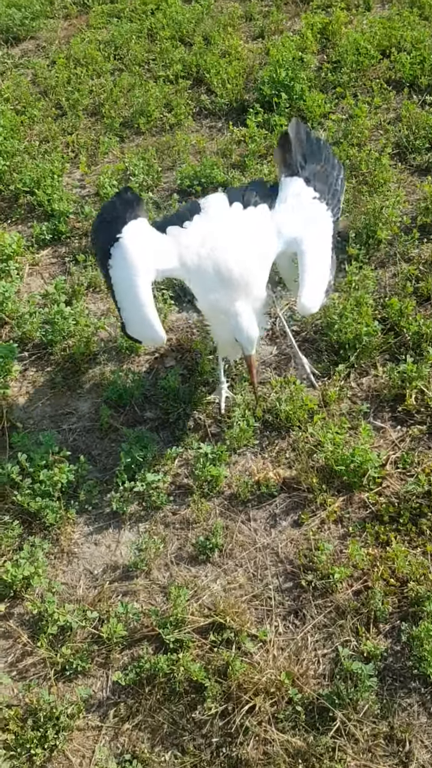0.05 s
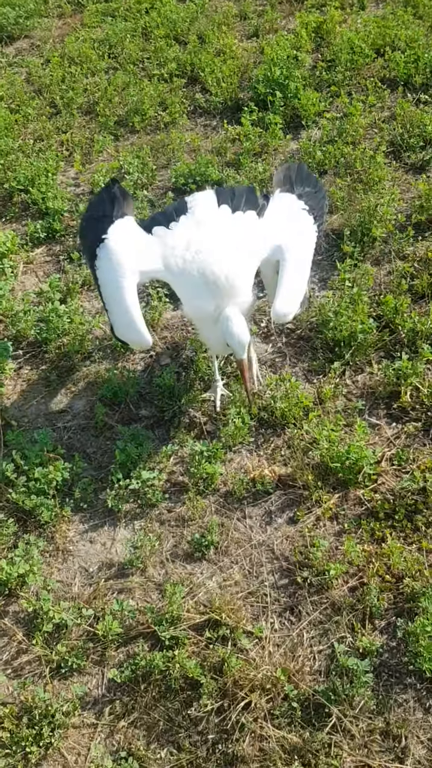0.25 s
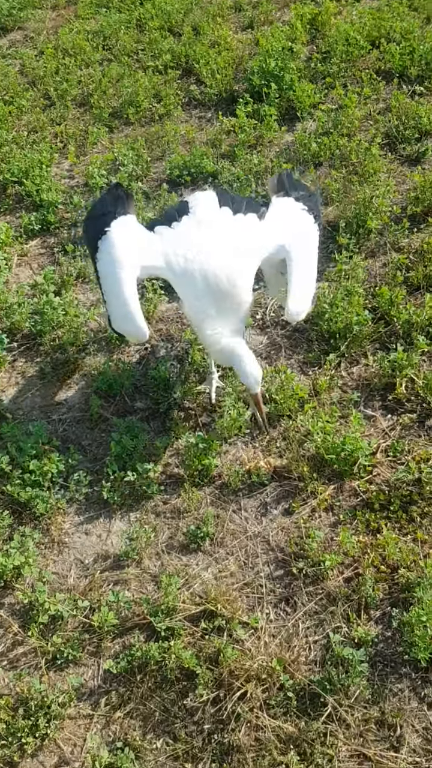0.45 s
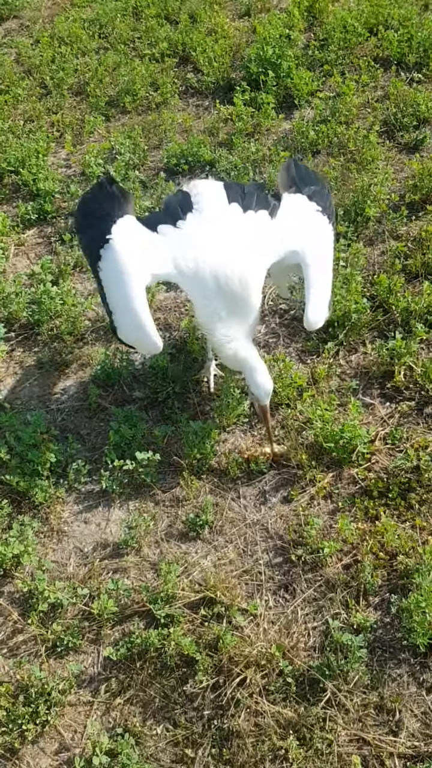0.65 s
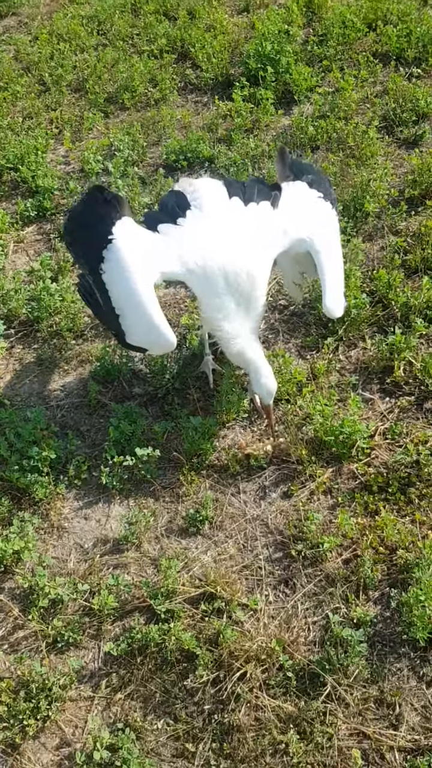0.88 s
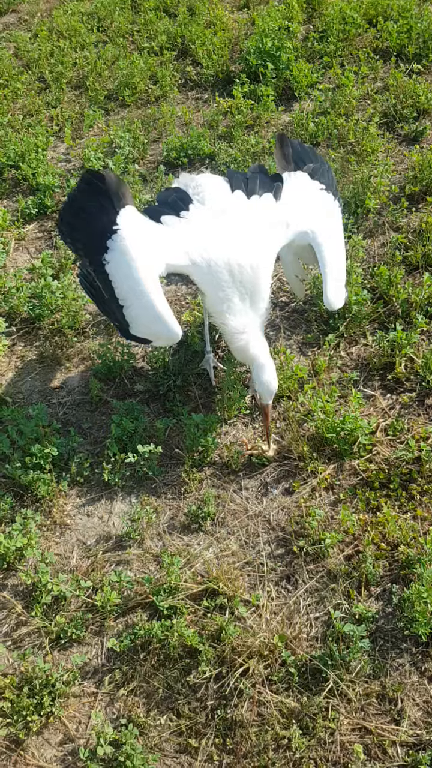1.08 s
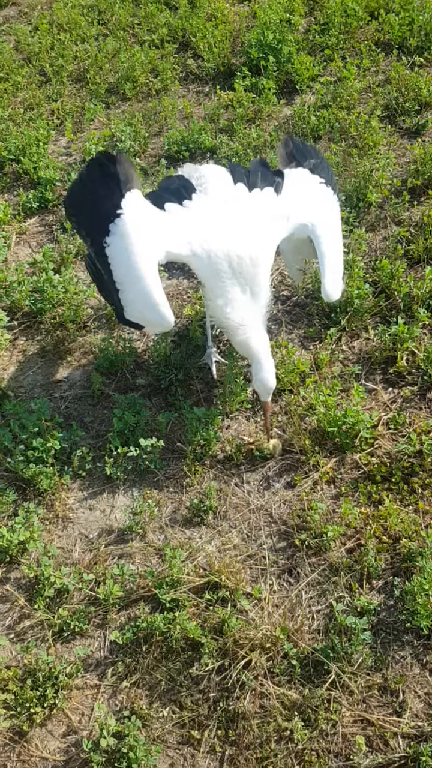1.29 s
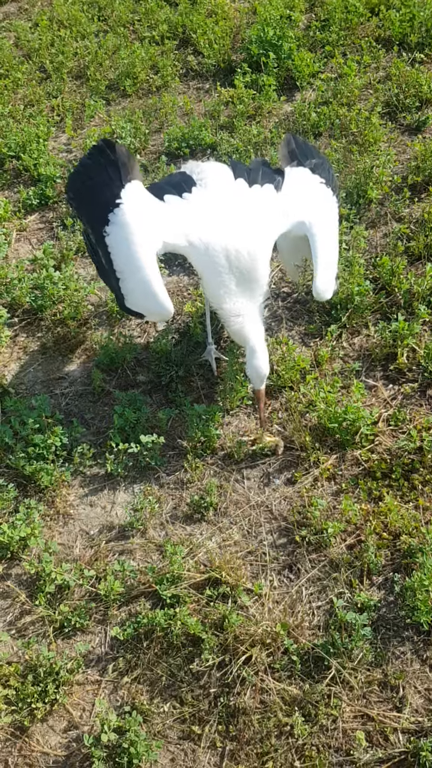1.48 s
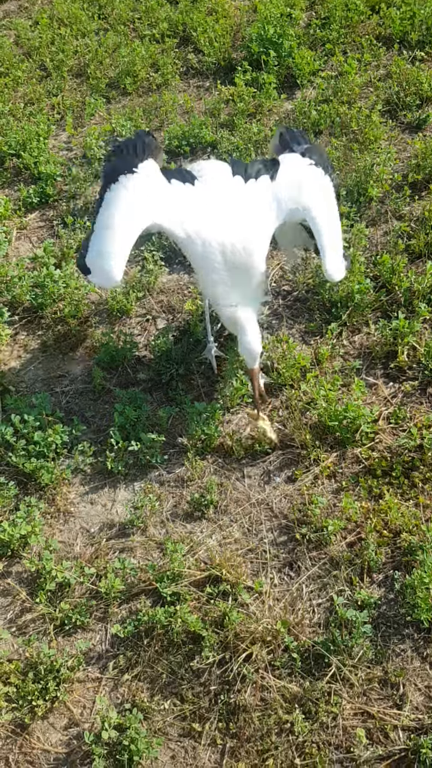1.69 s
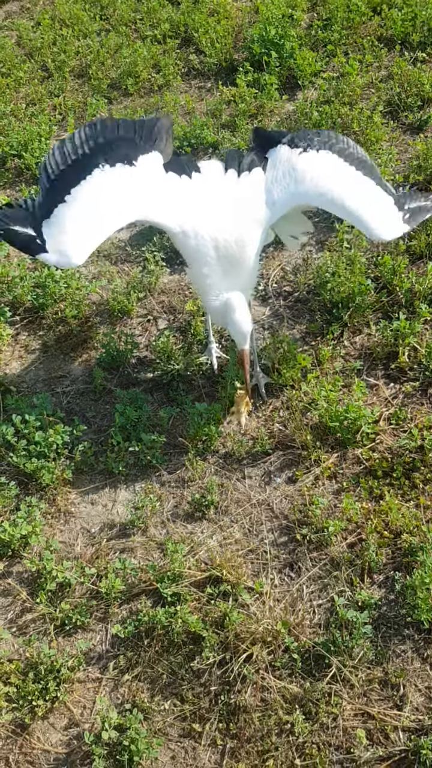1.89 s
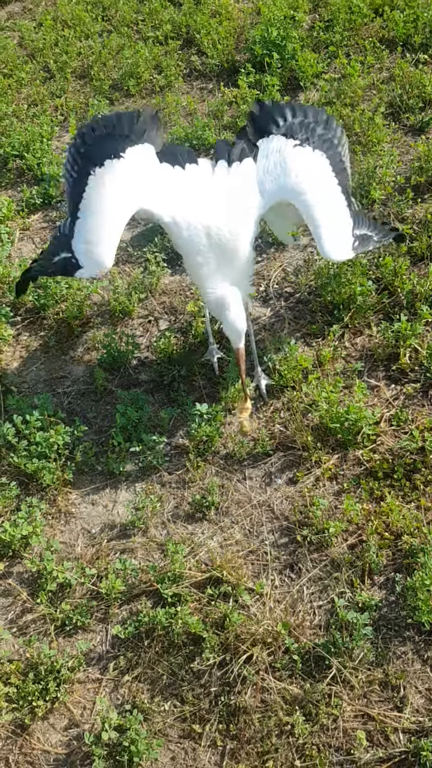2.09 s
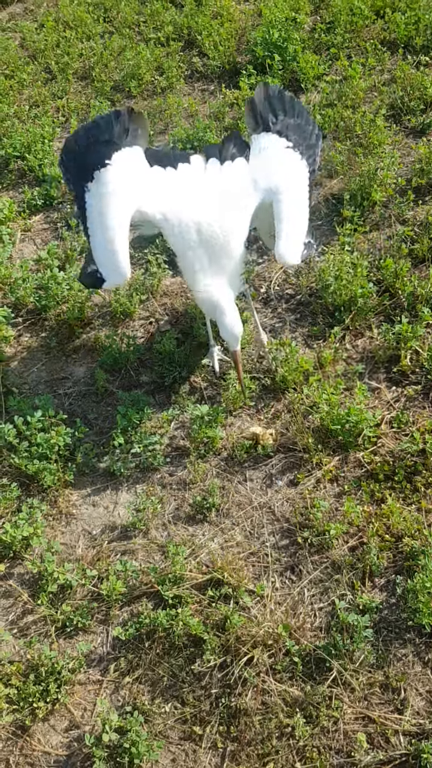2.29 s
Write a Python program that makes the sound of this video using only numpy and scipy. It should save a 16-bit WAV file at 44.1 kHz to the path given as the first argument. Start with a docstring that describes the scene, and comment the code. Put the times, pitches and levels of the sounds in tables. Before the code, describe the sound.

A large bird gives one long, harsh, whistling hiss, then snaps its bill.

```python
"""A stork hissing in a field

A stork gives one long, harsh hiss: turbulent air excites the resonances of its throat and bill, which
slide down as the call goes on, and now and then the jet locks onto a resonance and whistles.
A soft hollow wheeze and a snap of the bill follow. Behind the bird are a low rumble,
a motor's hum, faint far traffic and two soft thumps."""
import sys
import numpy as np
from scipy import signal
from scipy.fft import rfft, irfft, next_fast_len
from scipy.io import wavfile
from scipy.ndimage import uniform_filter1d, map_coordinates

SR = 44100
rng = np.random.default_rng(int(sys.argv[2]) if len(sys.argv) > 2 else 0)


def dump_mix(stems):
    """Bounce the given channels to the path in sys.argv[1] as a 16-bit WAV at rate SR."""
    frames = np.atleast_2d(stems).T  # one column per channel
    limited = np.clip(frames, -1, 1)  # hard clip at full scale
    pcm = np.round(limited * 32767).astype(np.int16)
    wavfile.write(sys.argv[1], SR, pcm)


N = 108045
TIME = np.arange(N) / SR
FRAME, HOP = 512, 64  # short-time spectrum, in samples


def amp(db):
    """Amplitude ratio of a level in decibels."""
    return 10 ** (np.asarray(db) / 20)


def along(points, hz):
    """Interpolation of (f/Hz, value) points on a logarithmic frequency axis."""
    f, values = np.transpose(points)
    return np.interp(np.log(hz + 1), np.log(f + 1), values)


def curves(rows, t):
    """Linear interpolation in time of each column after the first."""
    times, *columns = np.transpose(rows)
    return [np.interp(t, times, column) for column in columns]


def during(rows, t):
    """Gate: unity while a curve lasts, with a 20 ms ramp on either side."""
    return np.clip(np.minimum(t - rows[0][0], rows[-1][0] - t) / .02 + 1, 0, 1)


def wobble(rate):
    """Smooth random modulation: a spline through `rate` Gaussian knots a second."""
    return map_coordinates(rng.standard_normal(N // 8), [TIME * rate], mode="mirror")


def filtered(x, response):
    """Linear filtering: the spectrum is multiplied by a complex frequency response."""
    size = next_fast_len(N + SR // 4)
    return irfft(rfft(x, size) * response(np.fft.rfftfreq(size, 1 / SR)), size)[..., :N]


def noise(correlation):
    """Stereo white noise of unit power per Hz; rows of (f/Hz, correlation) link the channels."""
    def mid_side_gains(hz):
        angle = np.arccos(np.clip(along(correlation, hz), -1, 1)) / 2
        return np.array([np.cos(angle), np.sin(angle)])
    mid, side = filtered(rng.standard_normal((2, N)), mid_side_gains)
    return np.sqrt(SR / 2) * np.array([mid + side, mid - side])


def coloured_noise(spectrum, correlation):
    """Spectral shaping: noise whose density follows rows of (f/Hz, level/dB)."""
    return filtered(noise(correlation), lambda hz: amp(along(spectrum, hz)))


def pan(db):
    """Constant-power gains for a left-minus-right level difference."""
    gains = amp(np.array([np.atleast_1d(db), -np.atleast_1d(db)]) / 2)
    return gains / np.sqrt(np.mean(gains ** 2, axis=0))


def peak(hz, centre_hz, width_hz):
    """Lorentzian resonance curve: the amplitude halves at width_hz from the centre."""
    return 1 / (1 + ((hz - centre_hz) / width_hz) ** 2)


def rumble():
    """Low-frequency noise under slight, slow amplitude modulation."""
    # spectral density: f/Hz, level/dB
    spectrum = [(20, -84.5), (50, -67), (120, -70.5), (170, -81.5), (400, -93.5), (2000, -150)]
    low_noise = coloured_noise(spectrum, correlation=[(60, 0.31), (250, 0.56)])
    return low_noise * amp(0.63 * wobble(6.04)) * pan(db=4)


def motor_hum(pitch_hz=102.2):
    """Periodic vibration of a motor: a fundamental and a weak second harmonic, wavering slightly."""
    phase = 2 * np.pi * np.cumsum(pitch_hz + .5 * wobble(6.07)) / SR
    tone = np.sqrt(2) * (amp(-50) * np.sin(phase) + amp(-68) * np.sin(2 * phase))
    return tone * amp(1.3 * wobble(7.8)) * pan(db=17.5)


def far_traffic():
    """Distant traffic merges into stationary noise, strongest near 900 Hz."""
    # spectral density: f/Hz, level/dB
    spectrum = [(600, -104), (900, -88.5), (1300, -100.5), (1800, -105), (3000, -113), (6700, -113),
                (8100, -135), (10500, -114)]
    return coloured_noise(spectrum, correlation=[(900, -0.36), (3000, 0.087)])


def thumps():
    """Soft transients: low narrow-band noise under Gaussian envelopes."""
    # t/s, half-width/s, f/Hz, level/dB, left minus right/dB
    bursts = [(0.157, 0.017, 101, -55.5, -5), (1.495, 0.038, 59.6, -58.5, -16)]
    out = np.zeros((2, N))
    for at, half_width, centre, db, side_db in bursts:
        band = filtered(noise([(60, 0.8)]), lambda hz: peak(hz, centre, width_hz=45))
        out += band * amp(db) * pan(side_db) * np.exp(-((TIME - at) / half_width) ** 2)
    return out


def ridges(shape, sag_bins_per_s=6):
    """Random spectral modulation of unit variance: narrow, brief ridges that sink in frequency."""
    field = uniform_filter1d(rng.standard_normal(shape), size=2, axis=0)
    for frames in (50, 16):
        field = uniform_filter1d(field, size=frames, axis=1)
    row, frame = np.indices(shape)
    sheared_row = row + sag_bins_per_s * frame * HOP / SR
    field = map_coordinates(field, [sheared_row, frame], order=1, mode="mirror")
    return field / field.std()


def turbulence(hz, t):
    """Power spectrum of turbulent flow through the bill: broadband, with a moving treble cutoff."""
    # rush of air: t/s, level/dB, cutoff f/Hz
    airflow = [(.335, -10, 2500), (.365, 0.5, 4700), (.43, -7, 5600), (.58, -1, 7480), (.8, -1.5, 7500),
               (.93, -5, 7200), (1.1, -0.5, 6660), (1.37, -4.5, 6270), (1.5, -3, 5800), (1.67, -6, 5600),
               (1.885, -2.5, 4500), (1.955, -30, 3170)]
    # spectral density of the rush: f/Hz, level/dB
    rush_spectrum = [(550, -103), (900, -92.5), (2400, -75), (3400, -72), (4400, -78.5), (6100, -86),
                     (7400, -91), (8300, -118)]
    # spectral density of the thin fizz at the bill's edges: f/Hz, level/dB
    fizz_spectrum = [(8200, -120), (9400, -102), (12000, -100), (15500, -112)]
    flow_db, cutoff_hz = curves(airflow, t)
    rush = amp(along(rush_spectrum, hz)) ** 2 / (1 + (hz / cutoff_hz) ** 8)
    fizz = amp(along(fizz_spectrum, hz)) ** 2 * cutoff_hz / cutoff_hz.max()
    return (rush + fizz) * (during(airflow, t) * amp(flow_db)) ** 2


def flares(hz, t):
    """Power spectrum of side resonances, each excited briefly under a Gaussian envelope."""
    # t/s, half-width/s, f/Hz, level/dB
    side_modes = [(0.341, 0.011, 650, -68), (0.361, .013, 2760, -56), (0.365, 0.036, 1420, -74.5),
                  (0.568, 0.034, 3730, -64.5), (0.638, 0.036, 1660, -74.5), (0.802, 0.028, 2140, -66.5),
                  (0.846, 0.028, 3820, -58.5), (1.281, 0.034, 3690, -64.5), (1.62, 0.041, 1625, -65.5),
                  (1.66, 0.046, 3120, -68), (1.768, 0.016, 2820, -60)]
    power = 0
    for at, half_width, centre, db in side_modes:
        envelope = amp(db) * np.exp(-((t - at) / half_width) ** 2)
        power += (envelope * peak(hz, centre, width_hz=124)) ** 2
    return power


def resonance(track, hz, t, width_hz):
    """Power spectrum of a formant, a cavity resonance whose centre and level glide."""
    centre, db = curves(track, t)
    return (during(track, t) * amp(db) * peak(hz, centre, width_hz)) ** 2


def ringing(track, gain_db, rate):
    """A resonance close to self-oscillation gives a narrow tone of random amplitude and phase."""
    centre, db = curves(track, TIME)
    swing = wobble(rate) + 1j * wobble(rate)
    carrier = np.exp(2j * np.pi * np.cumsum(centre) / SR)
    return during(track, TIME) * amp(db + gain_db) * np.real(swing * carrier)


def swoops(hz, t, fall_fraction=0.59):
    """Power spectrum of a high resonance that is tuned downward as the bill moves."""
    # onset t/s, duration/s, starting f/Hz, level/dB
    glides = [(0.687, 0.15, 6070, -67), (0.952, 0.074, 6340, -71), (1.344, 0.14, 6900, -74),
              (1.659, 0.11, 6400, -75.5), (1.747, 0.072, 5100, -69)]
    power = 0
    for start, duration, from_hz, db in glides:
        progress = np.clip((t - start) / duration, 0, 1)
        envelope = amp(db) * np.sin(np.pi * progress) * np.sqrt(progress)
        power += (envelope * peak(hz, from_hz * (1 - fall_fraction * progress), width_hz=475)) ** 2
    return power


def hiss(ridge_db=3.5, rasp_db=1.0):
    """Source and filter: fluttering turbulence is shaped by the resonances of throat and bill."""
    # four formant tracks: t/s, f/Hz, level/dB
    main = [(.44, 2928, -74), (.68, 2914, -71), (.78, 3345, -58), (.83, 3400, -65.5), (.92, 3080, -62.5),
            (.97, 2879, -68), (1.24, 2934, -72), (1.34, 3080, -67.5), (1.45, 2560, -62),
            (1.56, 2642, -65.5), (1.61, 2590, -71.5), (1.69, 2660, -64), (1.775, 1830, -68),
            (1.87, 1700, -64.5), (1.95, 1550, -84.5)]
    middle = [(0.602, 2160, -83), (1.381, 2287, -69.5), (1.5, 2152, -59.5), (1.6, 2340, -66.5)]
    throat = [(.82, 1420, -86.5), (.94, 1400, -70.5), (1.06, 1290, -74), (1.76, 1209, -69),
              (1.93, 1157, -87)]
    windpipe = [(1.1, 626, -87.5), (1.33, 627, -71), (1.91, 593, -67), (1.97, 510, -85)]
    # likeness of the two channels: f/Hz, correlation
    correlation = [(500, 0.84), (4800, 0.41), (8500, .1)]
    hz, t, source = signal.stft(noise(correlation), SR, nperseg=FRAME, noverlap=FRAME - HOP)
    hz = hz[:, None]
    ridge_gain = amp(ridge_db * ridges(source.shape[1:]))
    power = turbulence(hz, t) * ridge_gain ** 2 + flares(hz, t) + swoops(hz, t) * ridge_gain
    for track, width_hz in (main, 164), (middle, 72), (throat, 112), (windpipe, 81.4):
        power += resonance(track, hz, t, width_hz)
    sound = signal.istft(source * np.sqrt(power), SR, nperseg=FRAME, noverlap=FRAME - HOP)[1][:, :N]
    sound += sum(ringing(track, gain_db=16.5, rate=80) for track in (main, middle))
    sound += ringing(throat, gain_db=17, rate=45)  # the throat rings more purely
    return sound * amp(rasp_db * wobble(220))


def whistles(lock_db=-33.5):
    """Lock-in of the jet to a resonance: a clear tone with its octave, turning rough below lock_db."""
    # one track per whistle: t/s, f/Hz, level/dB
    tracks = [
        [(.343, 2146, -46), (.374, 3555, -34.5), (.39, 3990, -45)],
        [(.565, 3600, -37), (.6, 4170, -38), (.664, 3970, -45), (.695, 3830, -47)],
        [(.7, 3055, -60), (.783, 3313, -32.5), (.81, 3290, -45)],
        [(.73, 3930, -41), (.76, 3910, -39), (.85, 3850, -41), (.905, 3740, -52)],
        [(.975, 3074, -50), (1.01, 3102, -29), (1.058, 3028, -25), (1.13, 3064, -35.5), (1.2, 2972, -31.5),
         (1.235, 2830, -44.5), (1.29, 2940, -35), (1.325, 2960, -51), (1.375, 2820, -38), (1.43, 2650, -51)],
        [(1.69, 2350, -44), (1.765, 1930, -42), (1.8, 1756, -48)],
    ]
    out = np.zeros(N)
    for track in tracks:
        pitch_hz, db = curves(track, TIME)
        slip = np.clip((lock_db - db) / 10, 0, 1)  # 0 locked, 1 loose
        jitter_hz = (17.96 + 50.3 * slip) * wobble(260)
        flutter_db = (0.66 + 2.5 * slip) * wobble(120)
        phase = 2 * np.pi * np.cumsum(pitch_hz + jitter_hz) / SR
        octave = amp(-29) * (1 - slip) ** 2 * np.sin(2 * phase)
        out += during(track, TIME) * amp(db + flutter_db) * np.sqrt(2) * (np.sin(phase) + octave)
    return out


def wheeze():
    """Soft flow noise, coloured by the cavity resonance of the throat, fades after the hiss."""
    # envelope of the breath: t/s, level/dB
    envelope = [(1.92, 1.5), (2.24, -2.5), (2.44, -28)]
    # spectral density: f/Hz, level/dB
    spectrum = [(500, -88.5), (1080, -89.5), (1260, -73), (1450, -98.5), (2300, -94), (6500, -110),
                (8200, -122), (11000, -105), (15500, -113)]
    db, = curves(envelope, TIME)
    breath = coloured_noise(spectrum, correlation=[(1300, 0.79), (3000, 0.033)])
    return during(envelope, TIME) * amp(db) * breath


def bill_snap(at_s=2.1992, rise_s=0.0007, cutoff_hz=6500):
    """Impact excitation: the bill claps shut once and its heavily damped modes decay exponentially."""
    # modes of the bill: delay t/s, f/Hz, level/dB, T60/s
    modes = [(0, 4720, -17.5, 0.0015), (.0002, 3600, -39, 0.0074), (.0003, 1550, -24, 0.0058),
             (.0011, 592, -26, 0.0089)]
    out = np.zeros(N)
    for delay, mode_hz, db, t60 in modes:
        age = np.maximum(TIME - at_s - delay, 0)
        attack = 1 - np.exp(-age / rise_s)
        out += attack * amp(db - 60 * age / t60) * np.sin(2 * np.pi * mode_hz * age)
    return filtered(out, lambda hz: 1 / (1 + (hz / cutoff_hz) ** 12))


def scene():
    """Superposition at two microphones, with phase and level differences that vary with frequency."""
    # phase lead of the call on the left: f/Hz, phase/rad
    lead = [(200, -2.5), (1400, 1.03), (2050, -0.14), (3000, 5), (6200, 4), (7500, 12.5)]
    # level difference for bird and traffic: f/Hz, left minus right/dB
    balance = [(200, -6), (550, -3.5), (1300, -4), (2000, 1), (5200, -1), (8600, -17.5), (15000, -7)]
    sides = np.array([[1], [-1]])
    call = filtered(hiss() + whistles(), lambda hz: np.exp(.5j * along(lead, hz) * sides))
    bird_and_traffic = call + far_traffic() + wheeze() + bill_snap()
    panned = filtered(bird_and_traffic, lambda hz: pan(along(balance, hz)))
    return panned + rumble() + motor_hum() + thumps()


def record(dry):
    """Band limiting: an ideal low-pass filter at 15720 Hz."""
    return filtered(dry, lambda hz: hz < 15720)


dry = scene()
out = record(dry)
dump_mix(out)
```